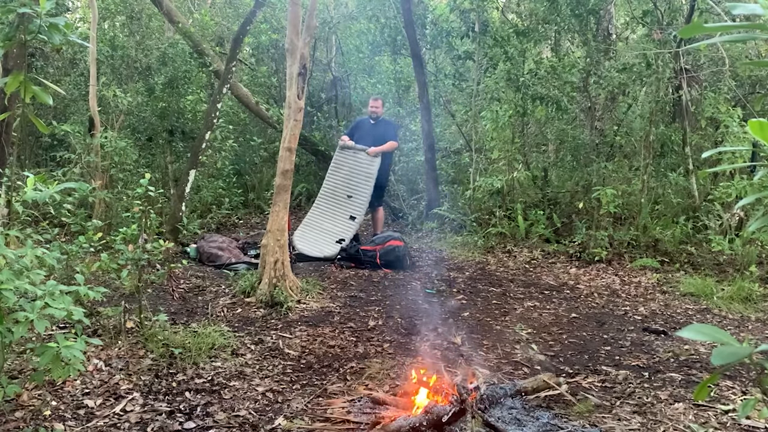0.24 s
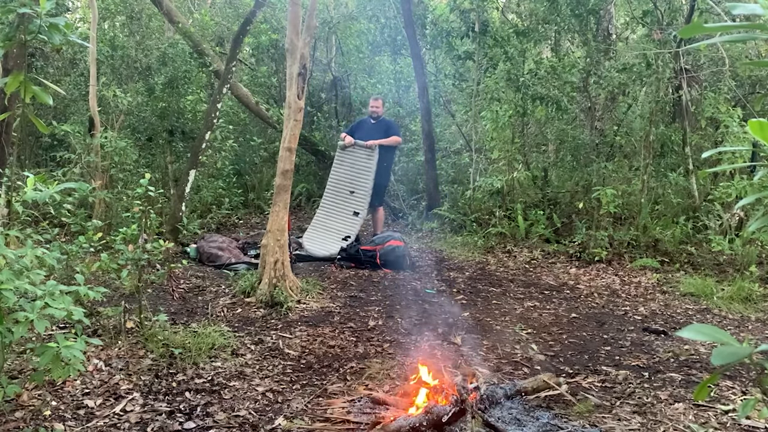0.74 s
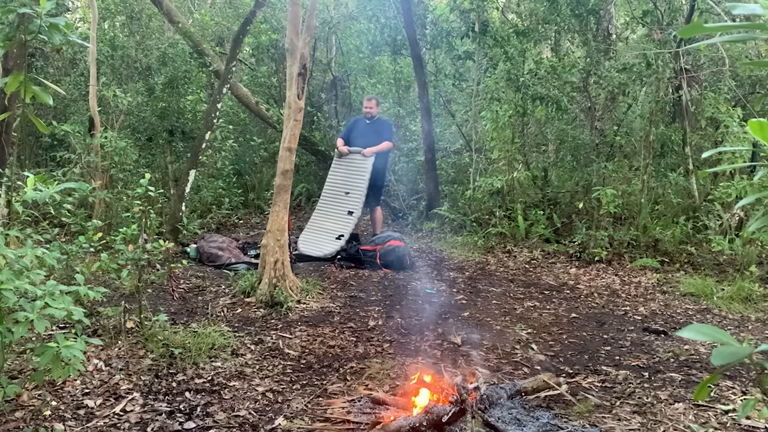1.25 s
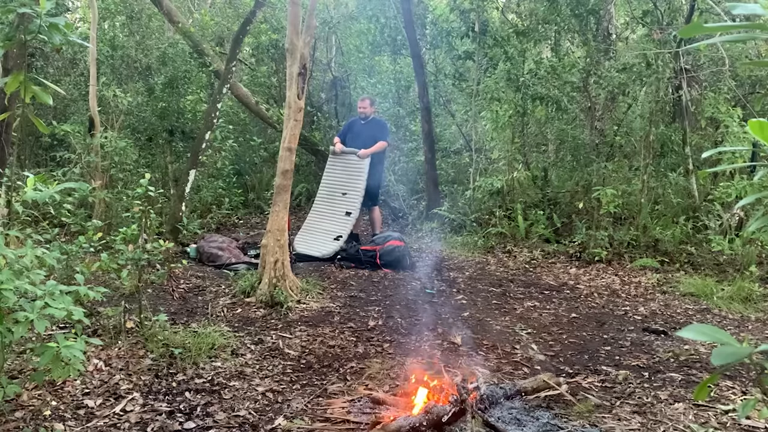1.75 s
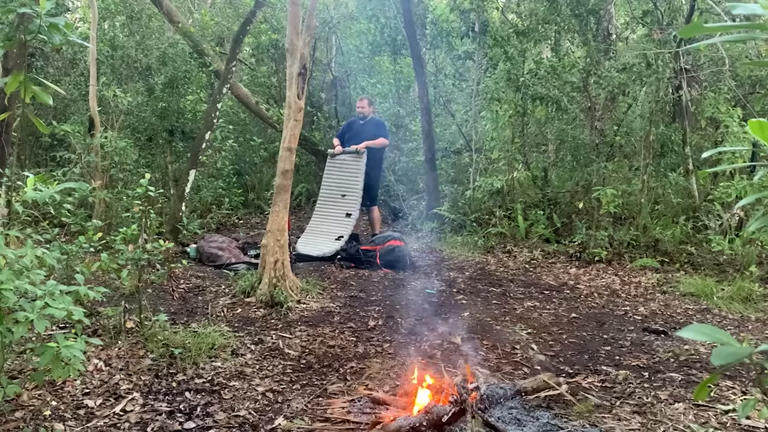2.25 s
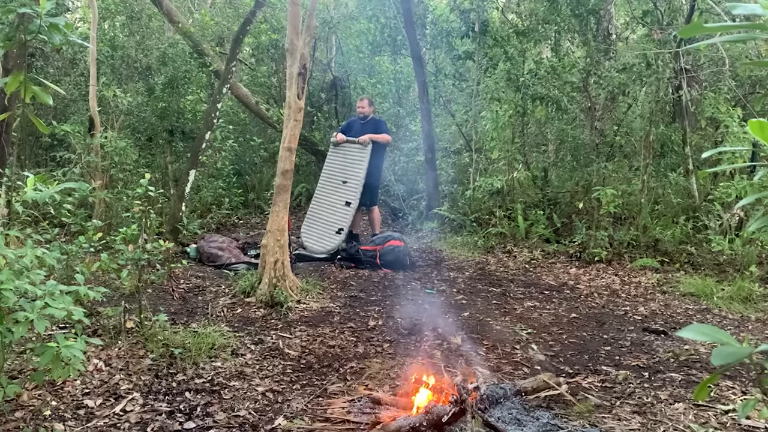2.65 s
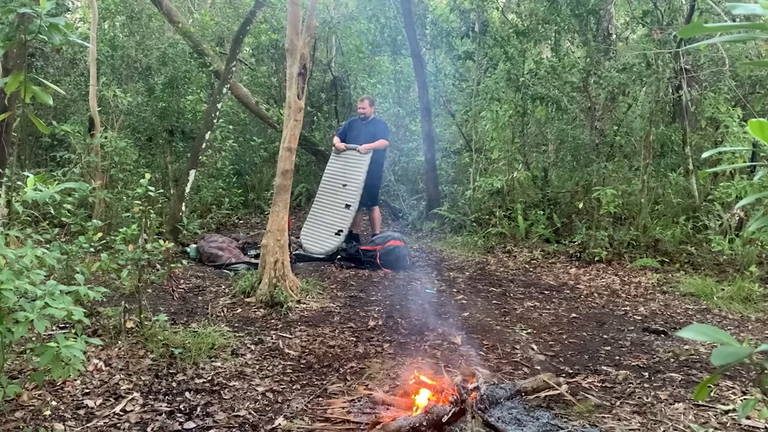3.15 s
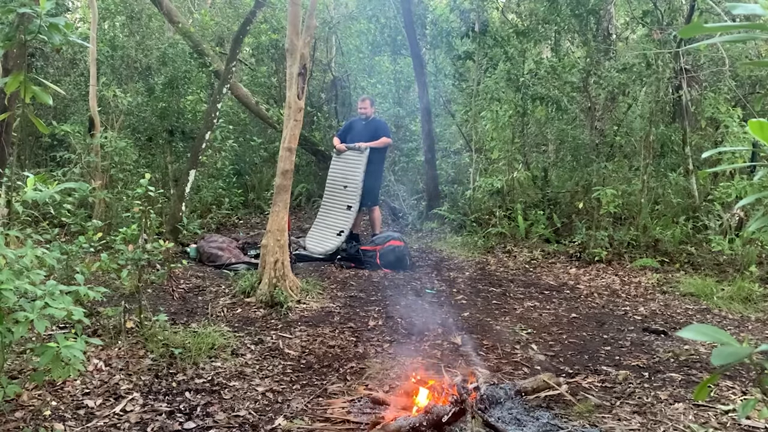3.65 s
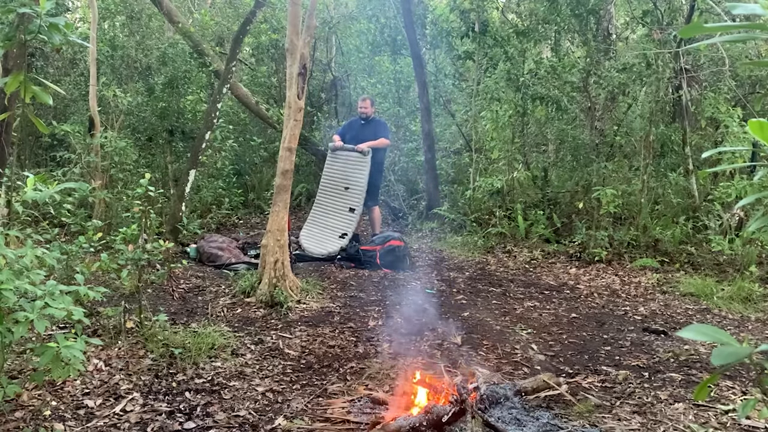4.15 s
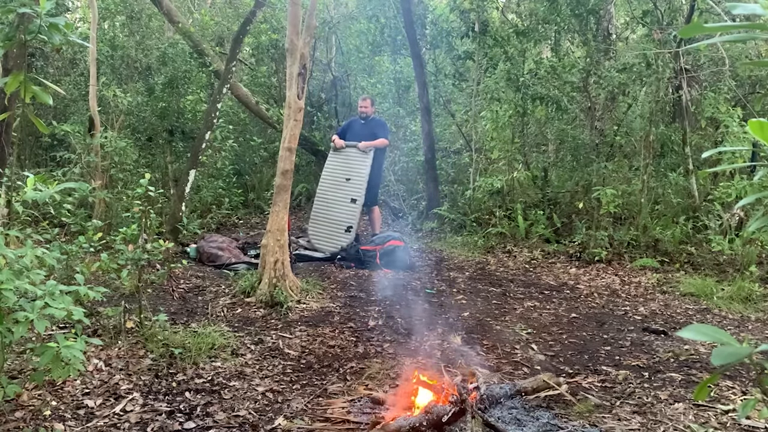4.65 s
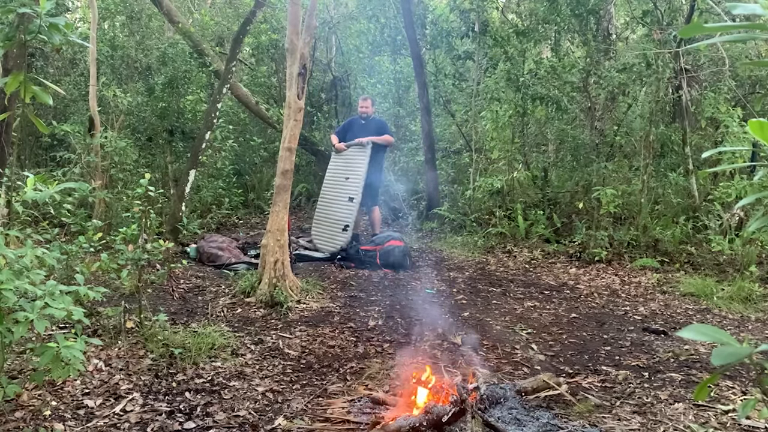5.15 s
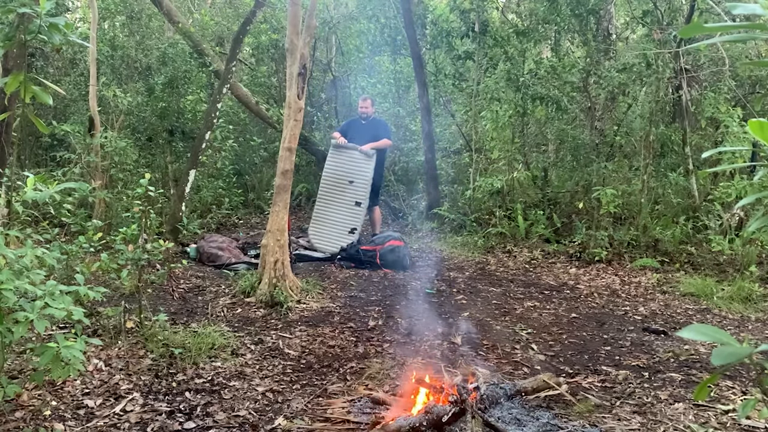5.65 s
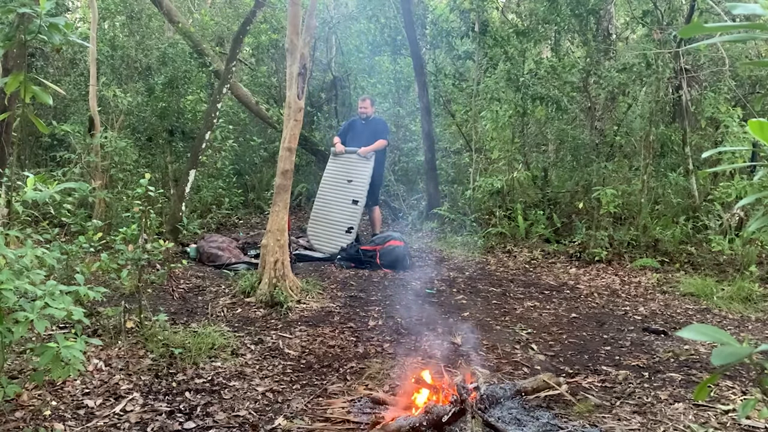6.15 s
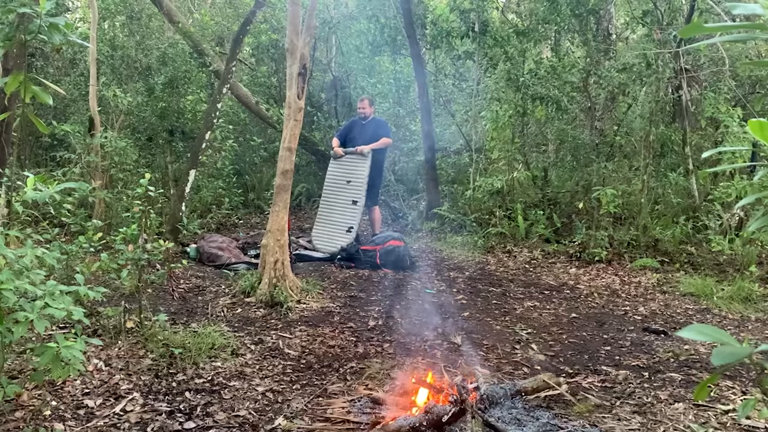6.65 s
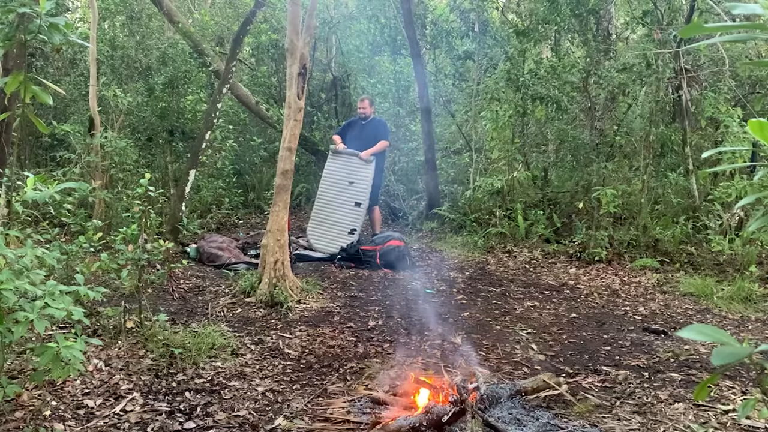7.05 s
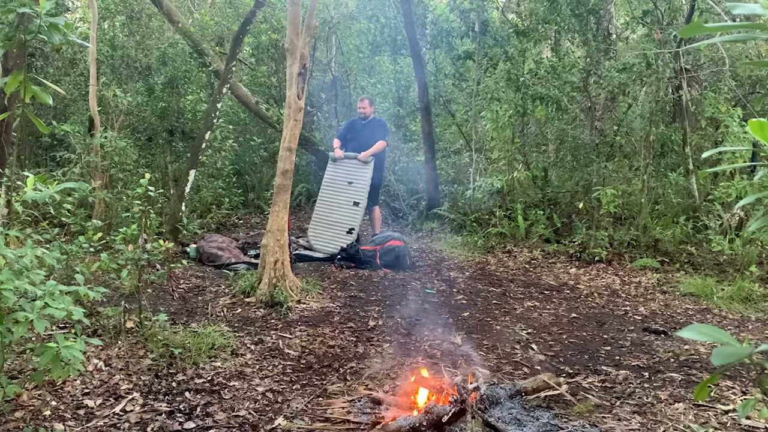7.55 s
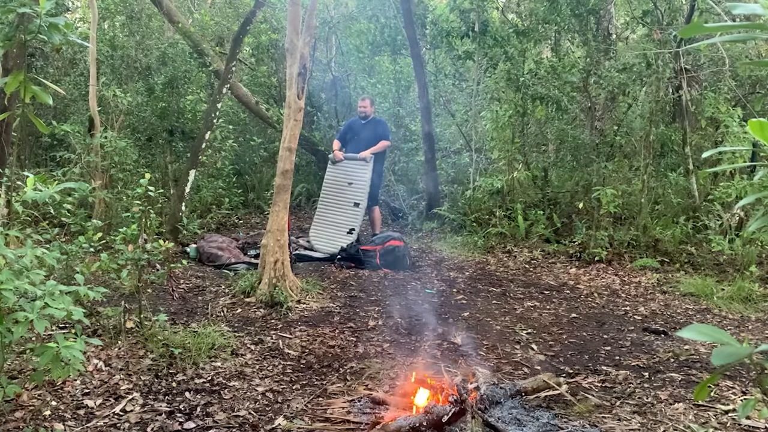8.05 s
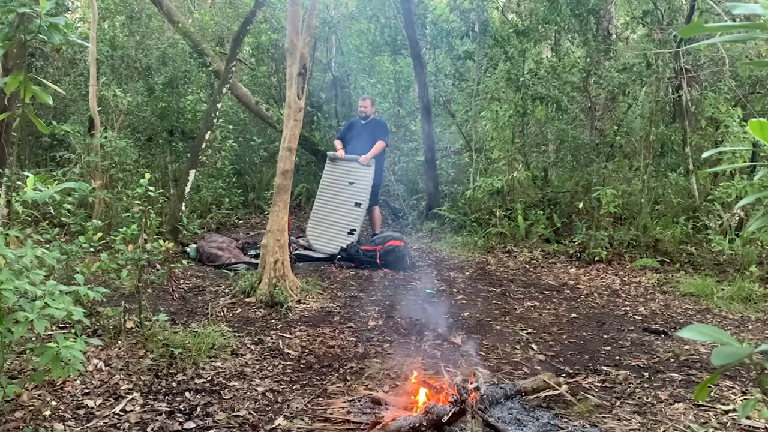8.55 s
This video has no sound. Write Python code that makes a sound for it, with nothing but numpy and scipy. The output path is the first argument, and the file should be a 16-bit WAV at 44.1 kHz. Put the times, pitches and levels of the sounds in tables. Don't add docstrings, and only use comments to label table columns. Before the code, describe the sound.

In a forest clearing, air rushes hissing from a sleeping mat's valve in uneven swells, strongest in the first seconds. Stiff coated cloth rustles, creases and snaps as it is folded, with soft hollow booms. A small campfire flutters low and pops sharply and irregularly. Thin steady insect drone and leafy hush lie behind. Outdoor stereo microphone, slight ground bounce and short echo from the trees.

```python
import sys
import numpy as np
from scipy import signal
from scipy.fft import rfft, irfft, next_fast_len
from scipy.io import wavfile

SR = 44100
rng = np.random.default_rng(int(sys.argv[2]) if len(sys.argv) > 2 else 0)


def invert_db(x):
    u = np.asarray(x, float) / 20
    return 10 ** u


def inscribe(sig):
    pcm = np.round(np.clip(np.atleast_2d(sig).T, -1, 1) * 32767)
    wavfile.write(sys.argv[1], SR, pcm.astype(np.int16))


N = 387638

# [f/Hz, level/dB per Hz]
HUSH_SPECTRUM = [(150, -44), (250, -25), (1170, -3), (3680, -26.5), (5100, -11), (8380, -12.5),
                 (12200, -34.5), (13500, -31), (15000, -56)]
HUSH_DB, HUSH_SWAY_DB = -51.5, 1.2
# [f/Hz, width/Hz, level/dB]
INSECTS = [
    (3920, 80, -57),
    (4075, 80, -59),
    (4880, 80, -67),
    (6870, 90, -65),
    (7180, 80, -65),
    (8150, 200, -64),
]

# [f/Hz, level/dB per Hz]
FLUTTER_SPECTRUM = [(15, -34), (25, -6), (64, 2), (81, 5), (310, -20.5), (400, -72), (520, -97),
                    (880, -120)]
# [t/s at full height, rise/s, hold/s, level/dB]
FLARES = [(.05, 0.033, 0.066, -39), (.37, 0.066, 0.02, -36), (.76, 0.096, 0.086, -42),
          (1.2, 0.099, 0.073, -35), (1.49, 0.02, 0.013, -35), (1.74, 0.078, 0.018, -33),
          (3.03, 0.11, 0.023, -39.5), (3.42, 0.081, 0.031, -37.5), (3.84, 0.24, 0.048, -39),
          (4.99, 0.069, 0.23, -38), (5.53, 0.24, 0.0089, -41), (6.4, 0.56, 0.26, -33.5),
          (6.83, .15, 0.093, -33.5), (7.1, 0.15, 0.091, -38), (7.7, 0.99, 0.11, -36),
          (8.17, 0.17, 0.24, -36)]
EMBER_DB, FLARE_FALL_DB_PER_S = -42, 90
# [t/s, peak level/dB, body f/Hz, crack level re
# body/dB]
POPS = [(.199, -27, 1510, 3), (.257, -33, 900, -15), (.322, -28, 800, -18), (.334, -28, 700, -18),
        (.359, -27, 1480, -10), (1.167, -20.5, 1830, -12), (1.274, -39, 1687, -2),
        (1.427, -27.5, 1610, -19), (1.633, -35, 2561, -5), (2.1662, -19, 2594, -2), (3.35, -25, 1378, -13),
        (3.39, -16.5, 1390, 4), (3.692, -29, 1012, -9), (3.708, -21, 1600, 1), (3.742, -23, 2980, -12),
        (3.802, -25, 1530, -14), (3.899, -21, 2190, -16), (4.158, -31, 2870, -14), (4.987, -18, 1558, -10),
        (5.008, -14, 760, -8), (5.443, -31, 842, -13), (5.518, -23, 1437, -8), (6.614, -28, 592, -11),
        (6.645, -29, 2990, 2), (6.656, -25, 3300, -10), (6.6985, -20.5, 2400, -1.5),
        (6.868, -25, 3140, -15), (6.937, -24, 4150, -12), (7.255, -35, 1735, -11), (8.06, -26, 3410, -3),
        (8.078, -29, 2200, -10), (8.113, -26, 1570, -11), (8.125, -32, 1673, -15),
        (8.152, -16.5, 1764, -16), (8.157, -23, 3300, -12), (8.245, -25, 3100, -18),
        (8.256, -28, 3200, -18), (8.717, -23.5, 1040, -21)]

# [t/s, peak level/dB, body f/Hz]
MORE_SNAPS = [(.122, -24, 1000), (.129, -23.5, 1070), (0.4712, -21.5, 2400), (1.789, -26, 2210),
              (1.815, -23, 2277), (2.121, -15, 1750), (2.158, -16, 1630), (2.255, -25, 1565),
              (3.814, -20, 2248), (4.142, -27, 2200), (4.378, -25, 2090), (4.424, -26, 1513),
              (4.956, -31, 550.4), (4.97, -16.5, 1448), (5.491, -17.5, 1922), (5.796, -21.5, 2057),
              (5.885, -18.5, 2244), (6.346, -31, 797), (6.363, -15.5, 2152), (6.8035, -17, 1758),
              (6.804, -21.5, 505), (6.918, -22, 2294), (7.428, -22, 2460), (7.593, -22, 1457),
              (8.007, -27, 1638), (8.1855, -24, 2240), (8.21, -25, 1620), (8.303, -22, 2150),
              (8.392, -26, 1497), (8.773, -17.5, 1575)]
MORE_SNAPS_CRACK_DB = -11
# [t/s, peak level/dB]
THUMPS = [
    (1.713, -49),
    (2.167, -34),
    (3.391, -29),
    (3.832, -39),
    (5.006, -32.5),
    (5.543, -41),
    (6.398, -42),
    (6.809, -50),
    (7.659, -36.5),
    (8.201, -32.5),
]
# [t/s, length/s, level/dB, centre f/Hz]
SCRUNCHES = [
    (2.162, 0.0056, -22, 2250),
    (3.822, 0.0075, -28, 2584),
    (4.984, 0.047, -34, 1610),
    (5.571, 0.058, -36, 3356),
    (6.368, 0.045, -41, 2190),
    (6.451, 0.038, -41, 3546),
    (6.648, 0.019, -39.5, 3950),
    (6.92, 0.024, -36.5, 3230),
]
# [f/Hz, level/dB per Hz]
CRISP_SPECTRUM = [(1300, -13), (1800, -5), (2300, 4.5), (3000, 5), (5000, -3.5), (9000, -17)]
BODY_SPECTRUM = [(900, 0), (1150, -0.5), (1500, 4.5), (1800, 4.5), (2200, -4)]
DULL_SPECTRUM = [(200, -9), (400, -4.5), (700, -4.5), (1000, -5), (1300, -30)]
# [t/s at full strength, rise/s, hold/s, body level/dB, dull level re body/dB]
FOLDS = [(0.137, .06, .01, -47, -5), (0.179, 0.2, 0.23, -44, 0.5), (0.664, 0.32, 0.24, -45, -1.5),
         (.95, .1, 0.41, -43, -1.5), (1.643, .12, 0.17, -41.5, -2.5), (2.059, 0.088, 0.14, -40, -3),
         (2.407, 0.17, 0.34, -45, 0), (2.798, .06, 0.064, -46, 7), (3.2, 0.37, 0.18, -58, 4.5),
         (3.377, 0.13, 0.069, -40, -0.5), (3.714, 0.26, 0.06, -42.5, 2.2), (3.816, 0.073, 0.11, -41, 2.5),
         (4.1, 0.037, 0.088, -47, 4), (4.435, 0.18, 0.22, -46, 2), (4.958, 0.43, 0.13, -42, -2),
         (5.266, 0.11, 0.22, -44.5, -3), (5.497, 0.26, 0.088, -41.5, 0.5), (5.87, 0.4, 0.48, -47.5, -1),
         (6.367, 0.1, 0.089, -41, 3), (6.626, 0.065, 0.33, -43, -2), (6.796, .02, 0.0092, -41, 1),
         (7.122, 0.069, 0.46, -48, -4.5), (7.567, 0.078, 0.14, -40.5, 0.3), (7.961, 0.06, 0.31, -43, -2),
         (8.534, 0.6, 0.17, -45.5, -1.5), (8.773, 0.11, 0.056, -38.5, -1)]
# [t/s at full speed, rise/s, hold/s, crisp level/dB]
SLIDES = [(.29, .3, 0.37, -44), (2.42, 0.065, 0.052, -44), (2.86, 0.41, 0.47, -37),
          (3.97, 0.61, 0.0093, -43), (4.16, 0.09, .02, -41), (4.53, 0.49, 0.03, -42.5),
          (5.5, 0.32, .05, -42), (5.88, 0.21, 0.026, -38.5), (6.8, 0.2, 0.035, -47),
          (7.12, 0.083, 0.19, -46), (8.13, 0.21, 0.016, -42)]
REST_DB, FOLD_FALL_DB_PER_S, SLIDE_FALL_DB_PER_S = -61, 228, 130
CRISP_IN_FOLD_DB, CRISP_WITH_FOLD = -49, 1
CRISP_RE_HISS_DB = -2

# [t/s at full strength, rise/s, hold/s, level/dB, f/Hz]
EDGE_TONES = [(.1, 0.16, .2, -49.5, 7860), (.95, .15, .1, -51.5, 8800), (1.2, 0.084, .05, -47.5, 7280),
              (1.4, .12, .15, -43, 7000), (1.62, .1, .03, -51.5, 7096), (3.0, .1, 0.27, -47, 9700),
              (3.55, .12, 0.13, -51, 6800), (4.65, 0.13, .25, -59, 8230), (6.05, 0.19, .15, -51.5, 7960),
              (7.42, .2, .15, -50, 8080), (8.65, 0.17, .1, -57, 6900)]
EDGE_WIDTH_HZ, EDGE_REST_DB = 910, -70.5
# [f/Hz, level/dB per Hz]
UPPER_SPECTRUM = [(4200, 8), (4800, 11), (5500, 9.5), (6200, 3.5), (7700, -27)]
HIGH_SPECTRUM = [(6900, -5.5), (7500, -3.5), (8250, -4.5), (8900, -12), (9800, -17.5), (11300, -17.5),
                 (12100, 1), (12500, -41)]
TOP_SPECTRUM = [(11900, -32), (12300, -27), (12700, -4), (13800, -9), (14400, -8), (14750, -34)]
# [t/s at full flow, rise/s, hold/s, level/dB, throat f/Hz]
PUSHES = [(0.0, .1, 0.16, -32, 3680), (0.813, 0.25, 0.0068, -32.5, 3610), (.83, .1, .05, -36, 4307),
          (1, .2, 0.12, -37.5, 4050), (1.326, 0.34, 0.1, -25, 3870), (1.422, 0.0984, 0.02993, -30, 3461),
          (1.602, .3, 0.066, -30, 3549), (2.021, 0.49, 0.03994, -33.5, 3534),
          (2.468, 0.11, 0.011, -36, 3605), (2.816, 0.62, 0.035, -36.5, 3743), (3.125, 0.57, 0.2, -36, 3630),
          (3.719, .6, .01, -34, 3510), (4.58, .3, 0.22, -39.5, 3994), (5.018, 0.3, 0.0061, -37.5, 3697),
          (5.34, 0.28, 0.16, -41.5, 3730), (6.0, .45, .2, -37, 3860), (6.382, 0.1634, .01, -38, 3667),
          (6.47, 0.0497, 0.0198, -40, 4012), (6.703, .15, 0.0076, -39.5, 3554),
          (6.798, 0.088, 0.0097, -38, 3686), (7.42, 0.65, .15, -36.5, 3690),
          (8.133, 0.68, 0.055, -41, 3630), (8.668, 0.48, 0.029, -38, 3685), (8.736, .1, .01, -37.5, 3560)]
LEAK_DB, LEAK_HZ, PUSH_FALL_DB_PER_S = -47, 3634, 46
# [t/s at full pressure, rise/s, hold/s, hiss level/dB, top hiss level/dB]
SQUEEZES = [(0.115, 0.13, 0.17, -46, -62.5), (0.505, 0.11, 0.046, -57, -72),
            (0.878, 0.15, 0.34, -39.5, -47), (1.3, 0.39, 0.24, -40, -47), (2.112, 0.19, 0.066, -54, -70),
            (2.452, .1, 0.0093, -44.5, -66), (2.848, 0.42, 0.11, -44, -58), (3.1, 0.24, 0.18, -41, -47),
            (4.604, 0.26, 0.36, -44.5, -54), (5.201, 0.11, .1, -50.5, -62),
            (6.004, 0.47, 0.018, -41.5, -59), (6.164, 0.22, 0.17, -45.5, -56),
            (6.709, 0.12, 0.0094, -50, -70), (7.447, 0.59, 0.029, -40.5, -54),
            (8.128, 0.34, 0.0083, -49.5, -72), (8.595, 0.42, 0.1, -44, -61)]
LEAK_HISS_DB, HISS_FALL_DB_PER_S, HISS_FLICKER_DB = -62, 73.5, 1.6
LEAK_TOP_DB, TOP_FALL_DB_PER_S, TOP_RISE_SHARE = -65.5, 150, 0.94
OVERTONE_DB, OVERTONE_WITH_FLOW, OVERTONE_WITH_HISS = -53.5, 0.91, 0.39
WHISTLE_DB, WHISTLE_WITH_FLOW, WHISTLE_WIDTH_HZ = -5.5, -.25, 280
RISE_DB = 15

GROUND_S, GROUND_DB, GROUND_HISS_DB = 0.00135, -1.5, -16.5
TREES_DB, TREES_T60_S = -17, 0.3
# [f/Hz, likeness/1]
LIKENESS = [(60, .96), (400, .66), (800, .62), (1400, .86), (2500, .76), (4000, .84), (5700, .65),
            (8000, .62), (13000, .92)]
# [f/Hz, left minus right level/dB]
PORTS = [(60, -2.4), (120, -1.5), (240, -.5), (470, .2), (940, .2), (1880, 0), (3730, .5), (7430, -5.5),
         (11500, -5.5), (13000, 0)]
# [f/Hz, phase/rad]
LEAD = [(4700, -.15), (5700, .5), (6400, -.4), (6900, -1.1), (7900, -5.6), (9400, -7.8), (11100, -4.6),
        (12150, -3.1), (12800, -.2), (13800, 0), (14500, 2.9)]
# [f/Hz, gain/dB]
CASING = [(25, -23), (40, -4.5), (11500, 1), (12100, -15), (12700, -6.5), (14200, -4), (14550, 3),
          (14800, -40)]


def rms_one(x):
    return x / np.sqrt(np.mean(x ** 2) + 1e-20)


def at_hz(points, hz):
    f, value = np.transpose(points)
    return np.interp(np.log(np.maximum(hz, 1)), np.log(f), value)


def add_db(*levels):
    return 10 * np.log10(sum(invert_db(2 * db) for db in levels))


def colour(x, points, lead=0):
    size = next_fast_len(N)
    hz = np.fft.rfftfreq(size, 1 / SR)
    response = invert_db(at_hz(points, hz)) * np.exp(1j * lead * at_hz(LEAD, hz))
    return irfft(rfft(x, size) * response, size)[..., :N]


def noise():
    return rng.standard_normal((2, N))


def drift(rate):
    r = np.exp(-80 * np.pi * rate / SR)
    slow = signal.lfilter([1], [1, -2 * r, r * r], rng.standard_normal(N // 40 + 2002))[2000:]
    return np.interp(np.arange(N) / 40, np.arange(len(slow)), rms_one(slow))


def swells(rows, rest_db, fall_db_per_s, mark=None, rest_mark=0):
    t = np.arange(0, N + 40, 40) / SR
    s, rise, hold, db = np.transpose([row[:4] for row in rows])[..., None]
    climb = (t - s) * RISE_DB / np.maximum(rise, .005)
    fall = (s + hold - t) * fall_db_per_s
    power = invert_db(2 * (db + np.minimum(0, np.minimum(climb, fall))))
    rest = invert_db(2 * rest_db)
    total = power.sum(0) + rest

    def full(v):
        return np.interp(np.arange(N) / SR, t, v)

    level = full(10 * np.log10(total))
    if mark is None:
        return level
    return level, full((np.dot(mark, power) + rest_mark * rest) / total)


def widen(mid, side, hz):
    alike = np.clip(at_hz(LIKENESS, hz), -1, 1)
    return np.sqrt((1 + alike) / 2) * mid + np.sqrt((1 - alike) / 2) * side * np.array([[1], [-1]])


def patchy(source, spectrum, shared_db, own_db, rate):
    size = next_fast_len(N)
    hz = np.fft.rfftfreq(size, 1 / SR)
    low, high = spectrum[0][0], spectrum[-1][0]
    shaped = rfft(source, size) * invert_db(at_hz(spectrum, hz))
    shaped[:, (hz < low) | (hz > high)] = 0
    out, together = 0, drift(rate)
    for centre in low * 2 ** np.arange(0, np.log2(high / low) + .5, .5):
        half_octaves = np.clip(np.log2(np.maximum(hz, 1) / centre) * 2, -1, 1)
        mid, side = irfft(shaped * np.cos(np.pi / 2 * half_octaves) ** 2, size)[:, :N]
        out = out + invert_db(shared_db * together + own_db * drift(rate)) * widen(mid, side, centre)
    return rms_one(out)


def band_at(hz, width_hz):
    r = np.exp(-np.pi * width_hz / SR)
    slow = signal.lfilter([1], [1, -2 * r, r * r], noise() + 1j * noise())
    mid, side = (slow * np.exp(2j * np.pi * np.cumsum(hz) / SR)).real
    return rms_one(widen(mid, side, np.mean(hz)))


def grains(per_s, spread_db, hiss):
    born = rng.random(N) < per_s / SR
    size = invert_db(spread_db * np.minimum(rng.exponential(1, N), 3))
    clicks = rms_one(born * size * rng.choice([-1, 1], N))
    return clicks * [[1], [.3]] + hiss * noise()


def ring(db, hz, t60, length=.06):
    t = np.arange(int(length * SR)) / SR
    return invert_db(db - 60 * t / t60) * np.sin(2 * np.pi * hz * t)


def add(track, s, sound):
    i = round(s * SR)
    track[i:i + len(sound)] += sound[:N - i]


def trees(x):
    t = np.arange(int(.3 * SR)) / SR
    tail = rng.standard_normal((2, len(t))) * invert_db(-60 * t / TREES_T60_S) * (t > .003)
    tail = signal.lfilter([.4], [1, -.6], tail)
    tail /= np.sqrt(np.sum(tail ** 2, axis=1, keepdims=True))
    return invert_db(TREES_DB) * signal.fftconvolve(x[None], tail, axes=1)[:, :N]


def ground(x, db):
    bounce = np.roll(x, round(GROUND_S * SR), axis=-1)
    return (x + invert_db(db) * bounce) / np.sqrt(1 + invert_db(2 * db))


def forest_hush():
    return invert_db(HUSH_DB) * patchy(noise(), HUSH_SPECTRUM, shared_db=HUSH_SWAY_DB, own_db=HUSH_SWAY_DB, rate=.5)


def insects():
    out = 0
    for hz, width, db in INSECTS:
        out = out + invert_db(db + 3 * drift(2)) * band_at(hz + 30 * drift(4), width_hz=width)
    return out


def flames():
    throb = invert_db(-4 + 0.42 * drift(2.1)) * band_at(np.full(N, 80.), width_hz=8.5)
    flutter = patchy(noise(), FLUTTER_SPECTRUM, shared_db=3.0, own_db=0.74, rate=7.1)
    return invert_db(swells(FLARES, EMBER_DB, FLARE_FALL_DB_PER_S) - 0.5) * (flutter + throb)


def snaps():
    out = np.zeros(N)
    hits = POPS + [tuple(row) + (MORE_SNAPS_CRACK_DB,) for row in MORE_SNAPS]
    chance = rng.uniform(0, 1, (len(hits), 2))
    t = np.arange(int(.06 * SR)) / SR
    sputter = rng.standard_normal((len(hits), len(t))) ** 3 * invert_db(-60 * t / 0.12) * (t > .003)
    for (s, db, hz, crack_db), (tone, spread), after in zip(hits, chance, sputter):
        body = ring(db + 4, hz, 5.5 / hz) + ring(db - 4, hz * (1.6 + .6 * spread), 5.5 / hz)
        crack = ring(db + min(crack_db, 1.5) + 9, 3200 + 1500 * tone, .001)
        band = signal.butter(1, [hz * .5, hz * 0.63], "band", fs=SR, output="sos")
        after = signal.sosfilt(band, after)
        add(out, s + .0004, -body - crack + invert_db(db - 22) * after)
    return ground(out, GROUND_DB)


def thumps():
    out = np.zeros(N)
    for s, db in THUMPS:
        add(out, s, ring(db + 2.5, 173, 0.12, length=.15) + ring(db - 3.0, 170, 0.041, length=.15))
    return out


def scrunches():
    out = np.zeros(N)
    creases = grains(per_s=1200, spread_db=-3.0, hiss=0.53)[0]
    for s, length, db, hz in SCRUNCHES:
        size, start = int(length * SR), int(s * SR)
        band = signal.butter(2, [hz * 0.6, hz * 1.28], "band", fs=SR, output="sos")
        run = signal.sosfilt(band, creases[start:start + size])
        add(out, s, invert_db(db) * rms_one(run) * signal.windows.tukey(size, .4))
    return out


def jet_hiss():
    return swells(SQUEEZES, LEAK_HISS_DB, HISS_FALL_DB_PER_S)


def fabric():
    fold_db, dull_share_db = swells(FOLDS, REST_DB, FOLD_FALL_DB_PER_S, np.array(FOLDS)[:, 4], 0.99)
    slide_db = swells(SLIDES, REST_DB, SLIDE_FALL_DB_PER_S)
    fold_crisp_db = CRISP_IN_FOLD_DB + CRISP_WITH_FOLD * (fold_db + 46.5)
    crisp_db = add_db(slide_db, jet_hiss() + CRISP_RE_HISS_DB, fold_crisp_db)
    body_db = fold_db - crisp_db
    dull_db = body_db + dull_share_db
    creases = grains(per_s=700, spread_db=3.5, hiss=1.0)
    crisp = patchy(creases, CRISP_SPECTRUM, shared_db=1.5, own_db=1.5, rate=18.0)
    body = invert_db(body_db - 2.5) * patchy(creases, BODY_SPECTRUM, shared_db=1.0, own_db=3.0, rate=26)
    dull = invert_db(dull_db - 3.0) * patchy(creases, DULL_SPECTRUM, shared_db=2.5, own_db=2.0, rate=7.6)
    return invert_db(crisp_db + 0.5) * (crisp + body + dull)


def edge_tones():
    db, hz = swells(EDGE_TONES, EDGE_REST_DB, HISS_FALL_DB_PER_S, np.array(EDGE_TONES)[:, 4], 8000)
    return invert_db(db + 2.2 * drift(10)) * band_at(hz, width_hz=EDGE_WIDTH_HZ)


def valve():
    throat_db, throat_hz = swells(PUSHES, LEAK_DB, PUSH_FALL_DB_PER_S, np.array(PUSHES)[:, 4], LEAK_HZ)
    hiss_db = jet_hiss()
    top_rows = [(s, rise * TOP_RISE_SHARE, hold, db) for s, rise, hold, _, db in SQUEEZES]
    top_db = swells(top_rows, LEAK_TOP_DB, TOP_FALL_DB_PER_S) - throat_db
    high_db = hiss_db - throat_db
    overtone_db = OVERTONE_DB + OVERTONE_WITH_FLOW * (throat_db + 37.0) - throat_db
    overtone_db = overtone_db + OVERTONE_WITH_HISS * (hiss_db + 50)
    whistle_db = WHISTLE_DB + WHISTLE_WITH_FLOW * (throat_db + 38.5)
    whistle_db = whistle_db - 0.21 * (np.clip(high_db, -14, 0) + 10.5)
    whistle = band_at(throat_hz + 45 * drift(12), width_hz=WHISTLE_WIDTH_HZ)
    whistle = whistle * invert_db(whistle_db + 2.13 * drift(12))
    throat = band_at(throat_hz, width_hz=1260) * invert_db(1.77 * drift(20) - 2.5)
    overtone = band_at(.9 * throat_hz + 3600, width_hz=1700) * invert_db(overtone_db + 3.3 * drift(13))
    upper = patchy(noise(), UPPER_SPECTRUM, shared_db=2.5, own_db=0.1, rate=15.6)
    upper = invert_db(0.36 * high_db - 11.5) * upper
    high = invert_db(high_db) * patchy(noise(), HIGH_SPECTRUM, shared_db=2.0, own_db=HISS_FLICKER_DB, rate=6.9)
    top = invert_db(top_db) * patchy(noise(), TOP_SPECTRUM, shared_db=1.5, own_db=1.5, rate=6)
    return invert_db(throat_db) * (whistle + throat + overtone + upper + high + top)


def scene():
    background = forest_hush() + insects() + flames()
    hits = snaps() + thumps() + ground(scrunches(), GROUND_HISS_DB)
    direct_hits = hits * invert_db(np.array([[.1], [-.1]]))
    mat = ground(fabric(), GROUND_HISS_DB) + edge_tones() + valve()
    return background + direct_hits + trees(hits) + mat


def top_cut(x):
    return signal.sosfilt(signal.butter(12, 15400, fs=SR, output="sos"), x)


def record(dry):
    half = np.array(PORTS) * [1, .5]
    left = colour(dry[0], half)
    right = colour(dry[1], half * [1, -1], lead=0.93)
    mix = colour(np.array([left, right]), CASING)
    return top_cut(mix)


dry = scene()
out = record(dry)
inscribe(out)
```